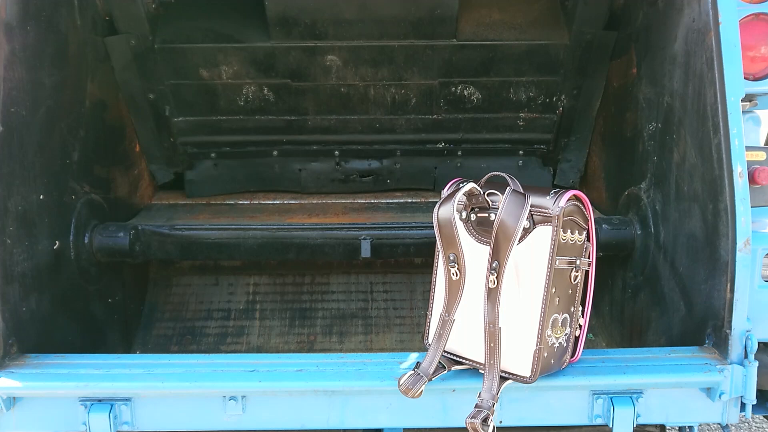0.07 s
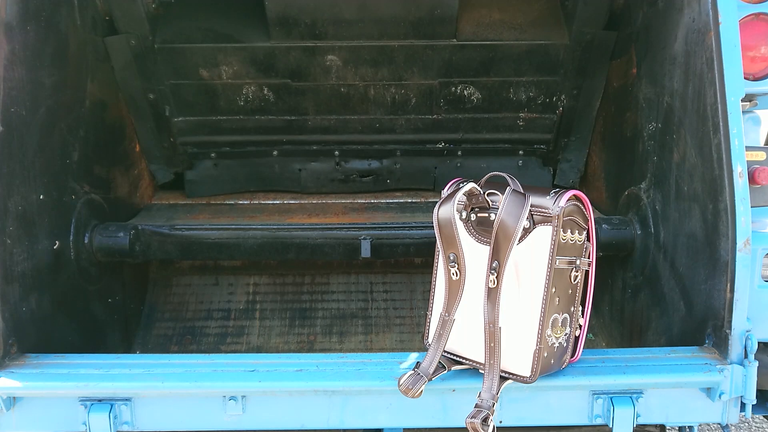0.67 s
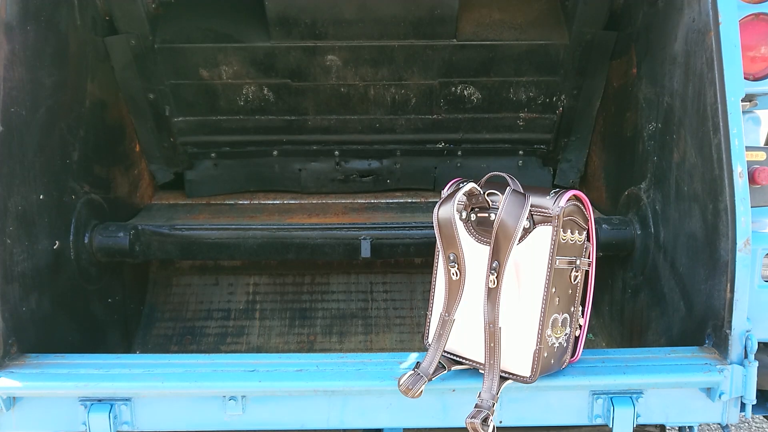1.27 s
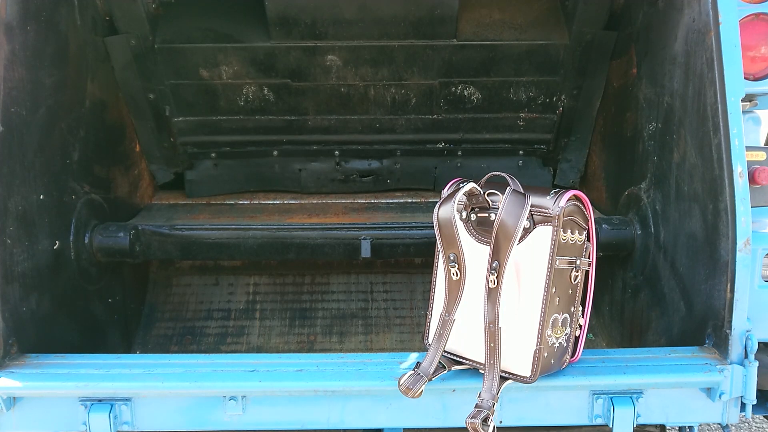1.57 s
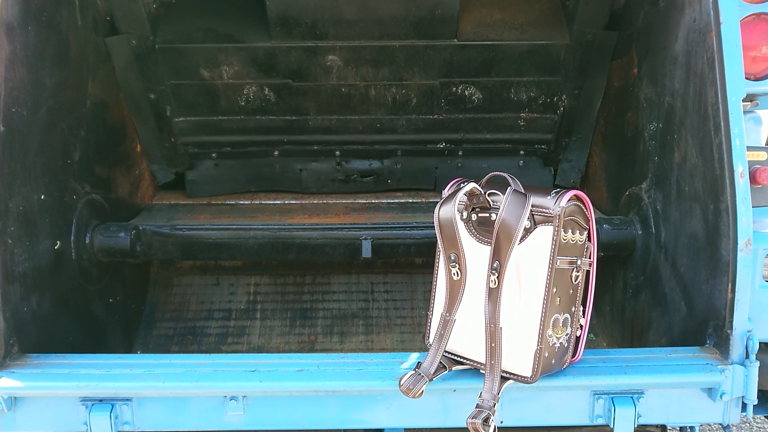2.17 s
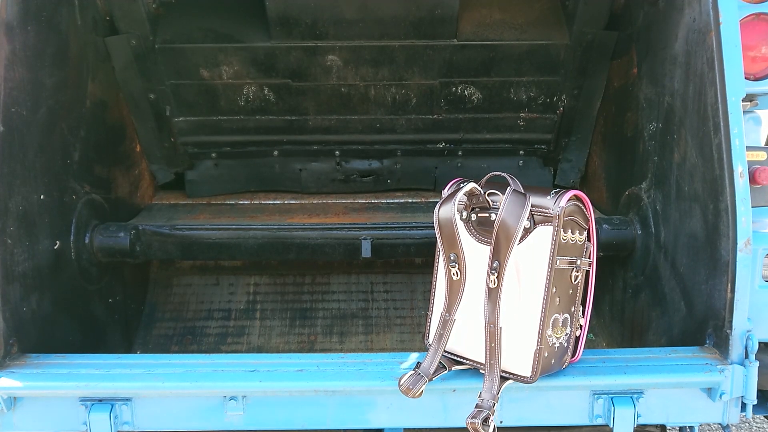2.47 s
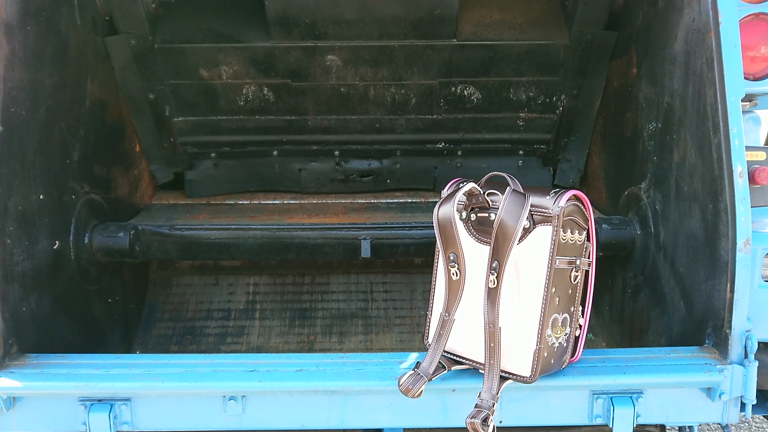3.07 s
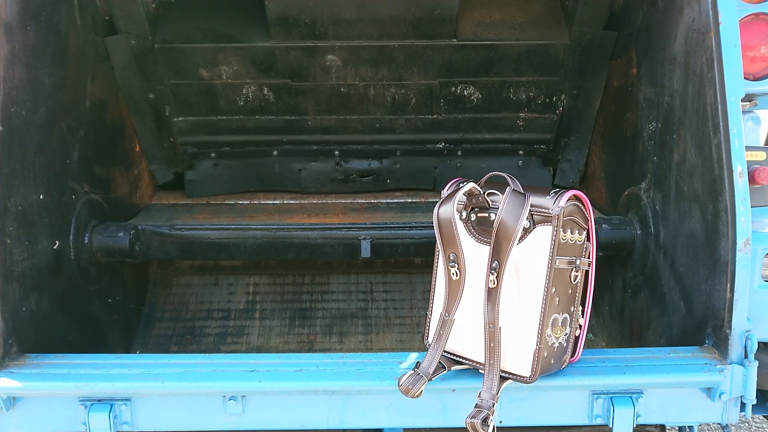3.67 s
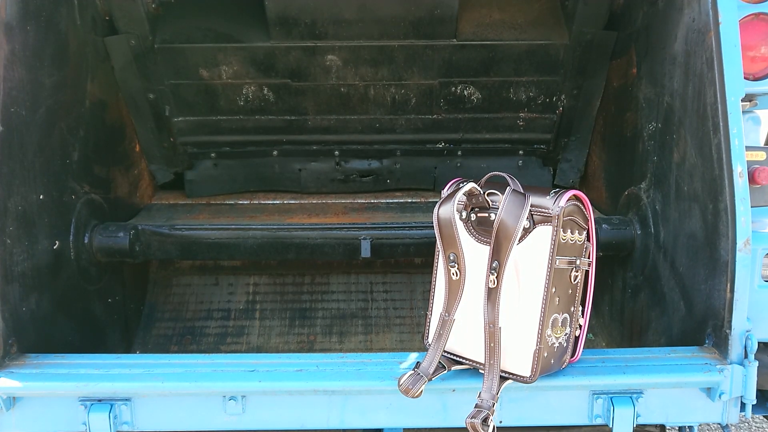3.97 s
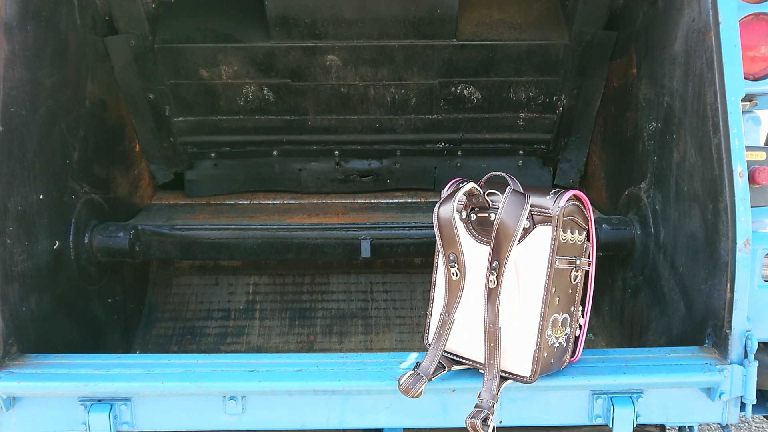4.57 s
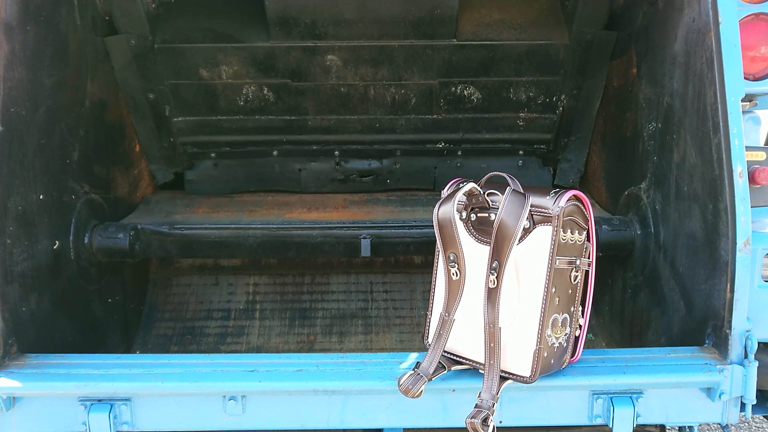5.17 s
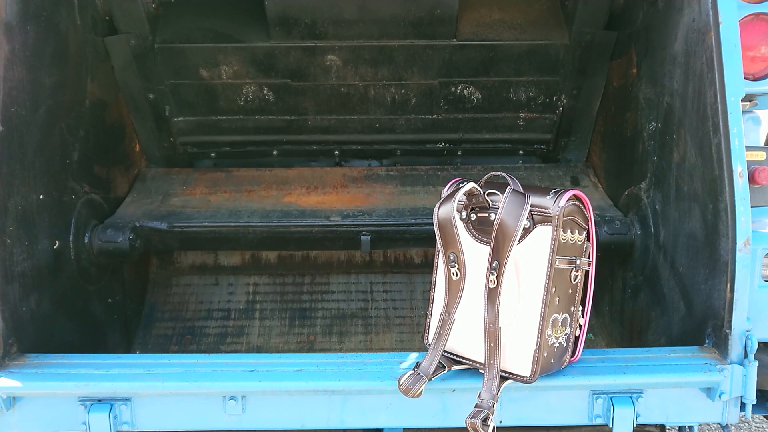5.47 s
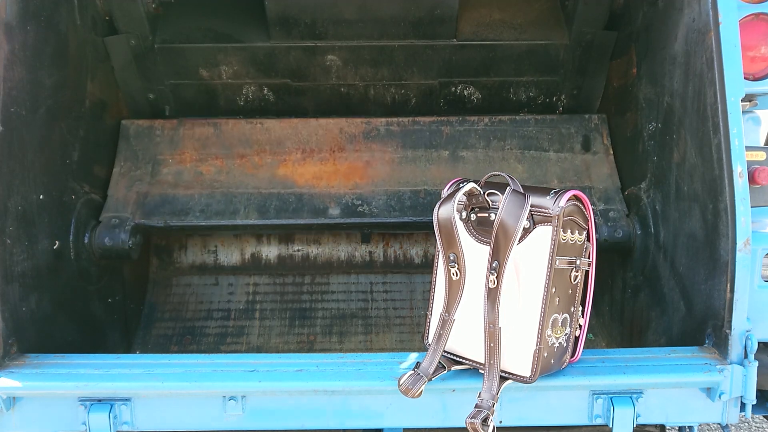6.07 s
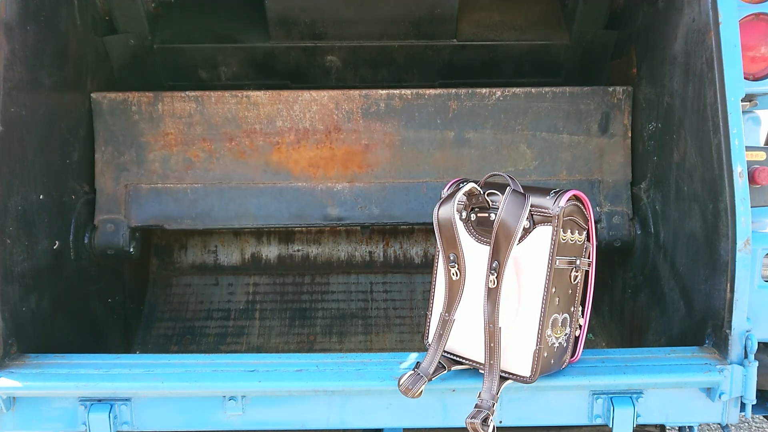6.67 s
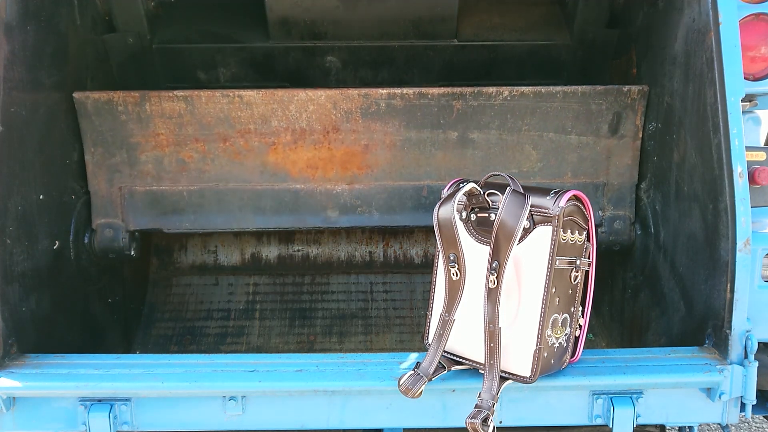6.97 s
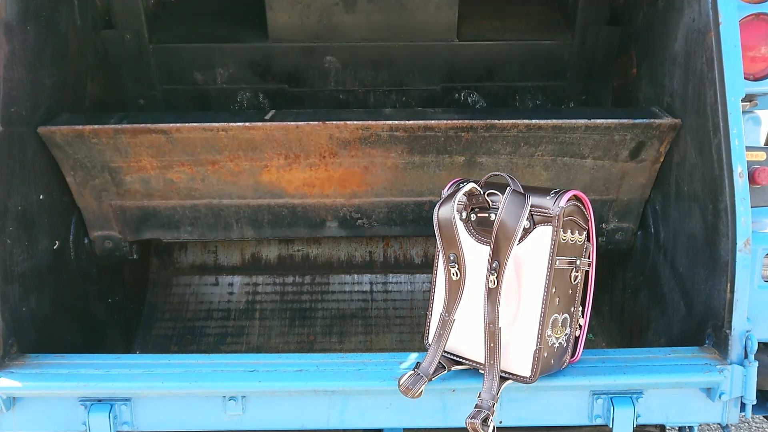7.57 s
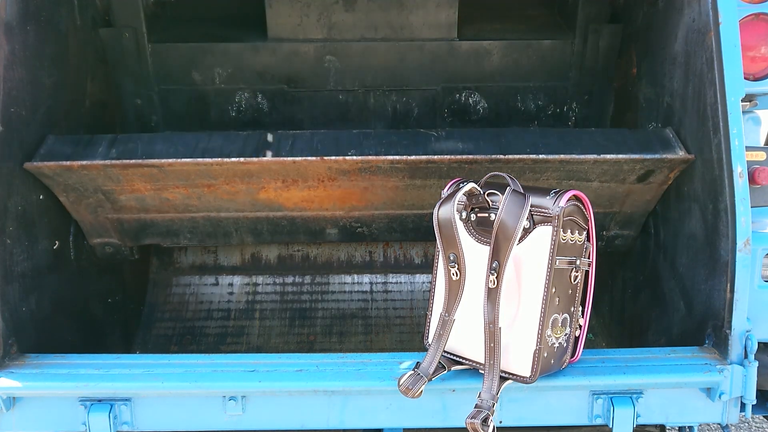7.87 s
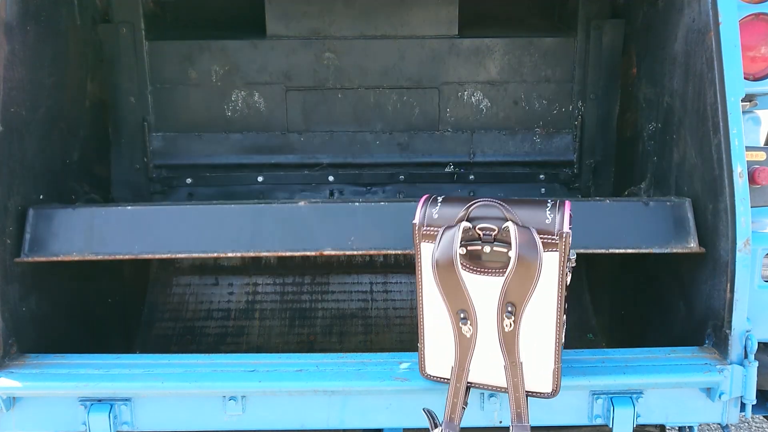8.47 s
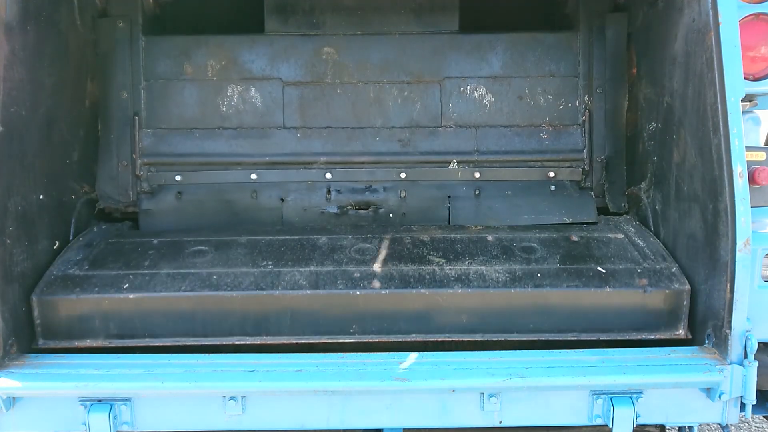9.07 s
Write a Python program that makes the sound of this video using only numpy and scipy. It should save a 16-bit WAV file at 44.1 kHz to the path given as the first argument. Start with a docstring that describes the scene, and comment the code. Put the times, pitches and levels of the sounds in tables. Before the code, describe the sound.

A diesel refuse truck rumbles at idle before the compactor grinds into gear, drones, squeaks and ends with a steel bang.

```python
"""A refuse truck heard at its open steel hopper. From 1 s the four-cylinder diesel idles; panels hum,
fittings tick, the body throbs. At 5.1 s the pump drive grinds into gear, oil rushes through the valves
and the engine speeds up. The hydraulics drone while the blade swings round, its dry pivot squeaking in
short slips until 6.9 s, its edges scraping the walls from 6.3 s.
At 9.2 s the blade slams against its stop and rattles."""
import sys
import numpy as np
from scipy import signal
from scipy.fft import rfft, irfft, next_fast_len
from scipy.io import wavfile

SR = 44100
rng = np.random.default_rng(int(sys.argv[2]) if len(sys.argv) > 2 else 0)


def generate_wav(sig):
    """Save sig (samples, or channels by samples) to the path in sys.argv[1] as 16-bit PCM at SR."""
    pcm = np.round(np.clip(np.atleast_2d(sig).T, -1, 1) * 32767).astype(np.int16)
    wavfile.write(sys.argv[1], SR, pcm)


N = 411012
TIME = np.arange(N) / SR
EVENT_TIME = TIME[:SR // 2]

VALVE_OPEN_S, VALVE_RISE_S = 5.16, 0.0099
RUMBLE_DB, CLATTER_DB, LOAD_GAIN_DB = -35, -43.5, 2
CHUG_RATE_HZ, CHUG_PEAK_S, CHUG_BELOW_HZ = 6.45, 3.216, 200
GRIND_START_S, GRIND_ATTACK_S, GRIND_HOLD_S, GRIND_T60_S = 5.14, 0.0093, 0.063, 0.24
GRIND_DB, GRIND_START_HZ, GRIND_SINK_OCT_PER_S = -27.5, 1670, 16

# engine speed: time_s, firing_hz
ENGINE_SPEED = [(0, 43.4), (5.2, 43.4), (5.5, 45.8), (5.8, 49.6), (6.1, 51.6), (6.4, 51.8), (9.32, 51.75)]
# knock per cylinder: level_db
KNOCK_DB = [4, 0, 7, -22]
# engine spectrum: freq_hz, density_db
ENGINE_SPECTRUM = [(35, -13), (55, -2), (85, 0.5), (130, -1.5), (185, 0.5), (220, -4), (290, -4.5),
                   (375, -8), (522, -16), (800, -16), (1270, -20), (2100, -25), (2600, -29), (3800, -32),
                   (5180, -37), (8300, -38), (10500, -45), (15500, -50)]
# bass chug depth: peak_s, rise_s, fall_s, depth_db
CHUG_DEPTH = [(4.25, 0.3, .25, 3.5)]
# rumble swells: peak_s, rise_s, fall_s, gain_db
RUMBLE_GAIN = [(2.7, .7, 0.49, .5), (4.25, 0.22, 0.37, 0)]
# pump harmonics 1 to 3 between swells: level_db
PUMP_HARMONIC_DB = (-43.5, -33, -44)
# moving blade loads the pump and retunes the hopper: harmonic, peak_s, rise_s, fall_s, gain_db
PUMP_SWELLS = [(1, 6.26, 0.92, 0.34, 10), (1, 7.91, 0.48, 1.3, 13.5), (2, 5.1, .06, 0.032, 6),
               (2, 8.2, 0.14, 0.24, 2), (2, 9.44, 1.36, 1, 4), (3, 8.09, 0.96, 1.83, 17.5)]
# orders ringing in the hopper under load: pump_multiple, lift_db, sweep_db
HOPPER_ORDERS = [(2.25, -48, -48), (3.125, -42, -44), (3.25, -46.5, -53), (4, -41.5, -41), (4.25, -51, -45),
                 (4.5, -44.5, -50), (5, -55, -45.5), (5.25, -50.5, -50), (5.5, -52, -61), (5.75, -51, -57),
                 (6, -56, -50.5), (6.25, -54, -48.5), (6.5, -62, -64), (7, -58, -56), (7.25, -76, -57),
                 (7.75, -50.5, -62), (8.25, -53, -55), (9.25, -72, -64), (14.25, -62, -57)]
# oil flow spectrum: freq_hz, density_db
OIL_SPECTRUM = [(45, -30), (62, 0), (110, -1), (160, -13), (230, 2.5), (320, -3.5), (450, -3), (620, -11),
                (800, -10.5), (1200, -21), (2000, -23), (4000, -37), (6000, -35.5), (8500, -40),
                (11000, -48), (15500, -50)]
# drive resonances: pitch_hz, width_hz, level_db
GEAR_MODES = [(820, 60, -7), (1220, 60, -13), (1470, 60, -4), (1810, 70, -10.5), (2180, 37, -3.5),
              (2240, 51, -17), (3450, 300, -21), (4060, 170, -32), (7400, 820, -17)]
# blade hits on the stop: start_s, level_db, tilt_db_per_oct, crack_t60_s
STOP_HITS = [(9.191, -26.5, 3, .06), (9.198, -12, 1.26, 0.063), (9.2025, -19.5, 2.5, 0.065),
             (9.2071, -12, -1.5, 0.068), (9.2113, -18, -2, 0.042), (9.2235, -21, 2, 0.025),
             (9.2301, -28, 1, .03), (9.24, -27, 0.5, .03), (9.256, -30, 2.5, .08), (9.262, -35, 2, .04),
             (9.268, -30, 2.5, .025), (9.284, -33, 1, .04), (9.3058, -27.5, 3, 0.048)]
# blade plate modes: pitch_hz, level_db, t60_s
BLADE_MODES = [(155, -4.5, 0.16), (221, -1, 0.12), (265, 2.5, 0.11), (345, -6, .08), (493, -5, 0.045),
               (527, -3, 0.12), (716, -12, 0.081), (980, -17, 0.15), (1320, -33, 0.2), (2070, -25, 0.12),
               (2870, -31, .15), (3300, -35, .14)]
# steel crack spectrum: freq_hz, density_db
CRACK_SPECTRUM = [(80, -10), (200, 4), (500, -4), (1000, -4), (1400, -9), (2000, -14.5), (4000, -22),
                  (6000, -27.5), (9000, -31), (15500, -39)]
# pivot stick-slip events: start_s, level_db
PIVOT_SLIPS = [(5.221, -36.5), (5.3043, -40), (5.5367, -37.5), (5.606, -36), (5.6695, -37.5), (5.7319, -40),
               (5.7976, -37.5), (5.8626, -36.5), (5.9264, -40), (6.0496, -44), (6.112, -40), (6.1379, -38),
               (6.1734, -36), (6.1994, -38), (6.2204, -38), (6.2696, -39), (6.2965, -38), (6.348, -44),
               (6.356, -39), (6.3824, -39), (6.418, -38), (6.4792, -38), (6.542, -38.5), (6.7979, -43),
               (6.8603, -39)]
# faint high tones that colour each squeak: pitch_hz, level_db, t60_s
SLIP_HIGH_TONES = [(7777, -24, .2), (8935, -18, .15), (10980, -23, .2), (13575, -18, .15),
                   (14186, -25, .15)]
# harder rubbing in mid-stroke: peak_s, rise_s, fall_s, gain_db
RUB_GAIN = [(6.2, 0.29, 0.26, 12), (8, 0.8, 1.1, 4.5)]
# treble filter on the squeaks: freq_hz, gain_db
SQUEAK_EQ = [(3000, -28), (6000, -4), (8800, 3), (9500, 3.5), (10300, -15), (11200, 2), (14000, 1.5),
             (15500, -1)]
# side wall resonances: pitch_hz, width_hz, level_db
WALL_MODES = [(2940, 1100, -55.5), (4260, 120, -64), (7540, 420, -60)]
# dry clicks close by: start_s, level_db
FITTING_CLICKS = [(2.7577, -16), (4.482, -32), (4.515, -19.5)]
# loose fittings: start_s, level_db, pitch_hz, t60_s
FITTING_TICKS = [(1.585, -42.5, 1770, 0.095), (1.605, -49, 6960, .05), (1.715, -58, 13500, .2),
                 (2.183, -49, 2900, 0.091), (2.187, -52, 6000, .075), (2.7572, -37.5, 4760, 0.011),
                 (4.305, -54, 9000, .04), (4.482, -55, 13500, 0.085), (4.512, -48, 6500, 0.056)]
# chafing steel, and a soft brush just before the drive grinds in (5.112 s): start_s, level_db, pitch_hz
CHAFE_CHIRPS = [(1.39, -51, 3780), (3.465, -49.5, 4000), (4.232, -48.5, 3880), (5.112, -40, 1210),
                (7.11, -48.5, 4700), (7.94, -43, 3020), (8.875, -41, 2130)]
# thud as the drive takes hold: pitch_hz, level_db, t60_s
THUD_MODES = [(232, -22.5, 0.14), (395, -23.5, 0.17)]
# dull body throbs: start_s, level_db, pitch_hz
BODY_THROBS = [(1.344, -33, 111.5), (1.785, -28.5, 86.6), (2.09, -31, 110), (2.34, -30, 90), (2.5, -39, 95),
               (3.198, -27, 102), (3.497, -27, 102.5), (3.812, -27, 102.3), (3.97, -29, 110),
               (4.115, -32.5, 109), (4.278, -28.5, 102), (4.429, -34, 130), (4.575, -35, 100),
               (4.784, -28, 96.5), (6.02, -28, 98)]
# panel hum at idle: firing_multiple, level_db, peak_s, width_s, gain_db
PANEL_ORDERS = [(1.001, -47, 1.2, .4, -4), (2, -46.5, 2.57, 0.38, 11.5), (4.15, -51, 3.21, 0.36, 12),
                (5.6, -50, 2.8, 0.58, 8.5), (6.1, -50, 2.7, 1, 4.5), (6.33, -47, 3.9, 0.73, 2),
                (8.57, -53.5, 2.56, 0.85, 9.5)]
# hopper resonances: pitch_hz, width_hz, level_db
STEEL_MODES = [(709, 33, -51.5), (991, 5.4, -55.5), (1527, 59, -58.5), (2140, 10, -70), (3790, 17, -70.5),
               (4170, 27, -73.5), (6210, 41, -67), (7490, 290, -65), (8920, 85, -68.5)]
# left-right likeness of the noise: freq_hz, correlation
STEREO_CORRELATION = [(50, 0.87), (200, 1), (500, 0.72), (1000, 0.46), (2000, 0.15), (5000, 0.3),
                      (15000, 0.046)]
# stereo balance: freq_hz, left_minus_right_db
STEREO_BALANCE = [(60, -5), (500, -3.5), (2000, -4), (5000, -1.8), (8000, -1), (13000, -5)]


def engine(firings, load, jitter_db=0.5, jitter_s=0.0004, noise_db=0.5, throb=0.071, split_hz=550):
    """Uneven firings ring the truck; gas and gear noise throb with the crank; the bass briefly chugs."""
    at = np.flatnonzero(np.diff(np.floor(firings)))
    at = np.clip(at + (jitter_s * SR * rng.standard_normal(len(at))).astype(int), 0, N - 1)
    knocks = np.zeros(N)
    knocks[at] = from_db(np.resize(KNOCK_DB, len(at)) + jitter_db * rng.standard_normal(len(at)))
    block = burst(t60_s=0.23, rise_s=0.00058)
    ringing = rms_one(signal.oaconvolve(knocks[None], block, axes=1)[:, :N])
    pulsing = 1 + throb * (np.cos(np.pi * firings) + np.cos(np.pi * firings / 2)) / 2
    sound = rms_one(equalise(ringing + from_db(noise_db) * hiss() * pulsing, ENGINE_SPECTRUM))
    low = signal.sosfiltfilt(signal.butter(2, split_hz, fs=SR, output="sos"), sound)
    bass = signal.sosfiltfilt(signal.butter(2, CHUG_BELOW_HZ, fs=SR, output="sos"), sound)
    beat = np.cos(2 * np.pi * CHUG_RATE_HZ * (TIME - CHUG_PEAK_S)) - .5
    chug = from_db(swell_db(CHUG_DEPTH) * (1 - load) * beat)
    rumble = from_db(RUMBLE_DB + swell_db(RUMBLE_GAIN)) * rms_one(low - bass + chug * bass)
    clatter = from_db(CLATTER_DB) * rms_one(sound - low)
    return from_db(LOAD_GAIN_DB * load) * (rumble + clatter)


def pump(firings, load, shaft_db=-43, shudder_hz=8.3, sweep_start_s=7.03, sweep_rise_s=0.78):
    """Pressure ripple drones and shudders in the blade; the overtones shift from lift to sweep."""
    cycles = 2 * firings + 0.0061 * drift(20)
    partials = [(3 / 4, shaft_db)]
    for harmonic, db in enumerate(PUMP_HARMONIC_DB, 1):
        swells = [row for k, *row in PUMP_SWELLS if k == harmonic]
        partials.append((harmonic, db + swell_db(swells)))
    drone = np.zeros(N)
    for order, db in partials:
        waver = 0.065 * drift(18)
        shudder = 0.11 * np.sin(2 * np.pi * shudder_hz * TIME + drift(3.5))
        drone += from_db(db) * (1 + waver + shudder) * tone(order * cycles)
    sweep = ramp(sweep_start_s, sweep_rise_s)
    for order, lift_db, sweep_db in HOPPER_ORDERS:
        gain = from_db(lift_db + (sweep_db - lift_db) * sweep)
        drone += gain * (1 + 0.15 * drift(10)) * tone(order * cycles)
    return drone * load


def oil_flow(firings, flow_db=-38, surge_db=8.5, settle_s=0.91, ripple=0.067, flutter_db=1.5):
    """Oil rushes through the valves in step with the pump, hardest just after they open."""
    level_db = flow_db + surge_db * np.exp(-np.maximum(TIME - VALVE_OPEN_S, 0) / settle_s)
    envelope = ramp(VALVE_OPEN_S, VALVE_RISE_S) * from_db(level_db + flutter_db * drift(25))
    strokes = 1 + ripple * (np.cos(4 * np.pi * firings) + np.cos(np.pi * firings))
    return envelope * rms_one(equalise(hiss() * strokes, OIL_SPECTRUM))


def drive_grind(tooth_hz=190, rough_db=2, rasp_db=-7.5, half_width_oct=0.71, hiss_db=-15):
    """Meshing teeth chatter and ring the gears; the rasp sinks as the slip dies away."""
    t = EVENT_TIME
    release = decay(GRIND_T60_S, np.maximum(t - GRIND_HOLD_S, 0))
    envelope = from_db(GRIND_DB) * np.minimum(t / GRIND_ATTACK_S, 1) * release
    centre_hz = GRIND_START_HZ * 2 ** (-GRIND_SINK_OCT_PER_S * t)
    chatter = 1 + 0.46 * (1 - 2 * (tooth_hz * t % 1))
    teeth = hiss(len(t)) * chatter * from_db(rough_db * drift(tooth_hz)[:len(t)])
    rasp = np.zeros_like(teeth)
    for hz in np.geomspace(300, 4800, 9):
        weight = 1 / (1 + (np.log2(hz / centre_hz) / half_width_oct) ** 4)
        rasp += weight * rms_one(resonance(resonance(teeth, hz, hz / 2), hz, hz / 2))
    steel = (mode_bank(teeth, GEAR_MODES) + from_db(hiss_db) * teeth) * decay(0.3)
    out = np.zeros((2, N))
    add(out, GRIND_START_S, envelope * (from_db(rasp_db) * rasp + steel))
    return out


def blade_slam(crack_db=13, ring_db=-3, tail_db=-22, tail_t60_s=0.67):
    """The blade hits its stop and rebounds: steel crack, plate modes, short hopper tail."""
    out = np.zeros((2, N))
    for start_s, db, tilt_db_per_oct, crack_t60_s in STOP_HITS:
        tilt = lambda hz: from_db(tilt_db_per_oct * np.log2((hz + 50) / 500))
        noise = burst(crack_t60_s, rise_s=0.00035) + from_db(tail_db) * burst(tail_t60_s, rise_s=0.01)
        crack = shaped(noise, lambda hz: from_db(at_hz(CRACK_SPECTRUM, hz)) * tilt(hz))
        ring = sum(from_db(mode_db) * decay(t60_s) * tilt(hz) * np.sin(2 * np.pi * hz * EVENT_TIME)
                   for hz, mode_db, t60_s in BLADE_MODES)
        add(out, start_s, from_db(db) * (from_db(crack_db) * crack + from_db(ring_db) * ring))
    return out


def pivot(rub_db=-62, crackles_per_s=45, crackle_db=11, slip_db=-5.5, snap_db=10.5, rough_db=1.8):
    """The dry pivot rubs with a crackling sizzle; each slip is a snap, a rasp and faint high tones."""
    snap = lambda: burst(t60_s=0.004, rise_s=0.0001)
    grains = (rng.random(N) < crackles_per_s / SR) * rng.uniform(0, 1, N)
    crackle = signal.oaconvolve(grains[None], snap(), axes=1)[:, :N]
    rubbing = ramp(VALVE_OPEN_S, VALVE_RISE_S) * from_db(rub_db + swell_db(RUB_GAIN))
    out = rubbing * (hiss() + from_db(crackle_db) * crackle)
    for start_s, db in PIVOT_SLIPS:
        tones = 0
        for hz, tone_db, t60_s in SLIP_HIGH_TONES:
            envelope = from_db(tone_db + 3 * rng.standard_normal()) * decay(t60_s)
            tones += envelope * np.sin(2 * np.pi * (hz * EVENT_TIME + rng.random((2, 1))))
        rasp = burst(t60_s=0.14, rise_s=0.0016)
        add(out, start_s, from_db(slip_db + db) * (rasp + from_db(snap_db) * snap() + tones))
    return equalise(out * from_db(rough_db * drift(170)), SQUEAK_EQ)


def wall_scrape(start_s=6.3, rise_s=0.65, uneven_db=3, catch_rate_hz=14):
    """The blade's edges catch unevenly on the side walls."""
    grit = mode_bank(hiss(), WALL_MODES)
    return grit * ramp(start_s, rise_s) * from_db(uneven_db * drift(catch_rate_hz))


def fittings(click_hz=8000, click_width_hz=6500, left_minus_right_db=10):
    """Loose and chafing parts click, tick and chirp; a soft brush leads into the grind."""
    impulses = np.zeros((2, N))
    for start_s, db in FITTING_CLICKS:
        add(impulses, start_s, from_db(db) * pan(left_minus_right_db))
    ticks = taps(FITTING_TICKS, width_ratio=0.56, rise_ratio=0.017)
    chirps = taps([(*row, 0.22) for row in CHAFE_CHIRPS], width_ratio=0.43, rise_ratio=0.033)
    return resonance(impulses, click_hz, click_width_hz) + ticks + chirps


def body_knocks(thud_s=5.191, rise_s=0.018, upper_ratio=1.86, upper_db=-5):
    """The body throbs in two low modes, and thuds as the drive takes hold."""
    thud = [(thud_s, db, hz, t60_s) for hz, db, t60_s in THUD_MODES]
    out = taps(thud, width_ratio=0.6, rise_ratio=0.033)
    envelope = (EVENT_TIME / rise_s * np.exp(1 - EVENT_TIME / rise_s)) ** 2
    for start_s, db, hz in BODY_THROBS:
        phase = 2 * np.pi * hz * EVENT_TIME
        modes = np.sin(phase) + from_db(upper_db) * np.sin(upper_ratio * phase)
        add(out, start_s, from_db(db) * envelope * modes)
    return out


def panel_hum(firings, load, waver=0.33):
    """Panels hum on engine orders, each in its own swell, until the speed leaves their resonances."""
    hum = np.zeros(N)
    for order, db, peak_s, width_s, gain_db in PANEL_ORDERS:
        envelope = from_db(db + swell_db([(peak_s, width_s, width_s, gain_db)]))
        hum += envelope * (1 + waver * drift(7.6)) * tone(order * firings)
    return hum * (1 - load)


def steelwork(load, load_gain_db=2.5):
    """Vibration keeps the hopper's resonances singing."""
    return from_db(load_gain_db * load) * mode_bank(hiss(), STEEL_MODES)


def whine(pitch_hz=1009, level_db=-56.5, wander_hz=3, waver=0.12):
    """A thin, wavering machinery tone, independent of engine speed."""
    cycles = np.cumsum(pitch_hz + wander_hz * drift(12)) / SR
    return np.sqrt(2) * from_db(level_db) * (1 + waver * drift(11)) * np.sin(2 * np.pi * cycles)


def from_db(db):
    """Decibels to gain."""
    return 10 ** (np.asarray(db) / 20)


def rms_one(x):
    """Scale to unit rms."""
    return x / np.sqrt(np.mean(x ** 2) + 1e-20)


def pan(left_minus_right_db):
    """Left and right gains."""
    return from_db(left_minus_right_db * np.array([[.5], [-.5]]))


def ramp(start_s, rise_s):
    """Linear rise from 0 to 1."""
    return np.clip((TIME - start_s) / rise_s, 0, 1)


def decay(t60_s, t=EVENT_TIME):
    """Exponential fall."""
    return from_db(-60 * t / t60_s)


def swell_db(rows):
    """Sum of lopsided bell curves."""
    return sum(db * np.exp(-((TIME - peak_s) / np.where(TIME < peak_s, rise_s, fall_s)) ** 2)
               for peak_s, rise_s, fall_s, db in rows)


def drift(rate_hz):
    """Random wander, unit rms."""
    knots = rng.standard_normal(2000)
    return rms_one(np.interp(TIME * rate_hz, np.arange(len(knots)), knots))


def tone(cycles):
    """Unit-rms sine, random start phase."""
    return np.sqrt(2) * np.sin(2 * np.pi * (cycles + rng.random()))


def at_hz(curve, hz):
    """Read a curve on a log-frequency axis."""
    freq_hz, value = np.transpose(curve)
    return np.interp(np.log(hz + 1), np.log(freq_hz), value)


def shaped(x, gain):
    """Filter by gain(hz)."""
    size = next_fast_len(x.shape[-1])
    return irfft(rfft(x, size) * gain(np.fft.rfftfreq(size, 1 / SR)), size)[..., :x.shape[-1]]


def equalise(x, curve):
    """Filter by rows of freq_hz, gain_db."""
    return shaped(x, lambda hz: from_db(at_hz(curve, hz)))


def resonance(x, hz, width_hz):
    """Two-pole band-pass, unit peak gain."""
    r = np.exp(-np.pi * width_hz / SR)
    poles = [1, -2 * r * np.cos(2 * np.pi * hz / SR), r * r]
    return signal.lfilter(np.array([1, 0, -1]) * (1 - r * r) / 2, poles, x + 1e-18)


def mode_bank(x, modes):
    """Parallel resonances, each at its own rms level."""
    return sum(from_db(db) * rms_one(resonance(x, hz, width_hz)) for hz, width_hz, db in modes)


def hiss(size=N):
    """White stereo noise: alike in the bass, apart in the treble."""
    padded = next_fast_len(size)
    alike = at_hz(STEREO_CORRELATION, np.fft.rfftfreq(padded, 1 / SR))
    bins = rng.standard_normal((2, 2 * len(alike))).view(complex)
    mid, side = bins * np.sqrt([1 + alike, 1 - alike])
    return np.sqrt(padded / 2) * irfft([mid + side, mid - side], padded)[:, :size]


def burst(t60_s, rise_s):
    """Half a second of stereo noise that swells and dies."""
    return hiss(len(EVENT_TIME)) * (1 - np.exp(-EVENT_TIME / rise_s)) * decay(t60_s)


def taps(rows, width_ratio, rise_ratio):
    """Contacts that each excite one broad resonance."""
    out = np.zeros((2, N))
    for start_s, db, hz, t60_s in rows:
        width_hz = hz * width_ratio
        contact = burst(t60_s, rise_ratio * t60_s)
        ring = resonance(resonance(contact, hz, width_hz), hz, width_hz)
        add(out, start_s, from_db(db) * np.sqrt(SR / width_hz) * ring)
    return out


def add(out, start_s, sound):
    """Mix a sound in."""
    at = round(start_s * SR)
    out[:, at:at + sound.shape[-1]] += sound[..., :N - at]


def scene(right_lag_s=0.00004):
    """Engine and pump share one shaft; the machinery lies a little to the right."""
    firing_hz = np.interp(TIME, *np.transpose(ENGINE_SPEED))
    firings = np.cumsum(firing_hz) / SR
    load = (firing_hz - firing_hz.min()) / np.ptp(firing_hz)   # 0 at idle, 1 at top speed
    truck = engine(firings, load) + panel_hum(firings, load) + steelwork(load) + whine()
    hydraulics = drive_grind() + pump(firings, load) + oil_flow(firings)
    contacts = pivot() + wall_scrape() + blade_slam() + fittings() + body_knocks()
    left, right = shaped(truck + hydraulics + contacts, lambda hz: pan(at_hz(STEREO_BALANCE, hz)))
    return np.array([left, np.interp(TIME - right_lag_s, TIME, right)])


def record(dry, start_s=0.96, highpass_hz=44, lowpass_hz=15900):
    """Steep high-pass, silence before start_s, soft clip, steep low-pass."""
    highpass = signal.butter(8, highpass_hz, "high", fs=SR, output="sos")
    lowpass = signal.ellip(10, .1, 80, lowpass_hz, fs=SR, output="sos")
    gated = signal.sosfilt(highpass, dry) * (TIME >= start_s)
    return signal.sosfilt(lowpass, np.tanh(gated))


dry = scene()
out = record(dry)
generate_wav(out)
```